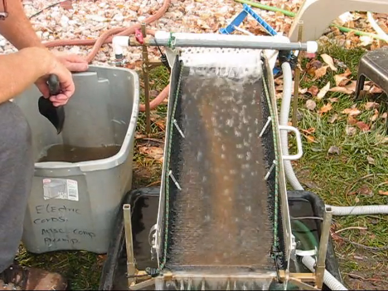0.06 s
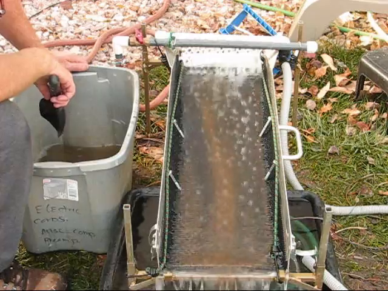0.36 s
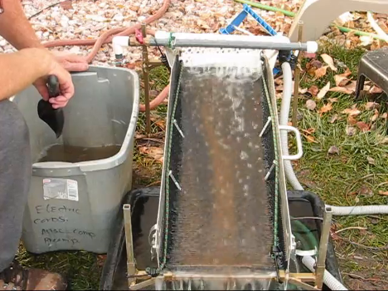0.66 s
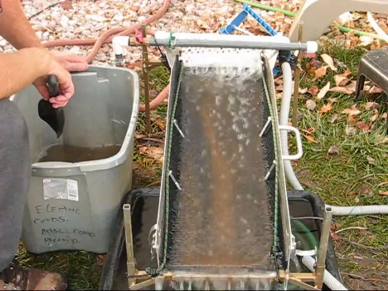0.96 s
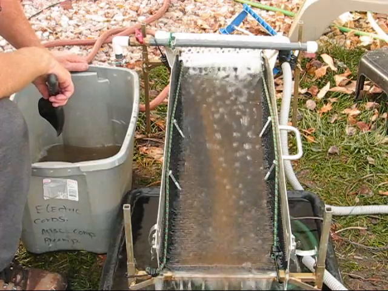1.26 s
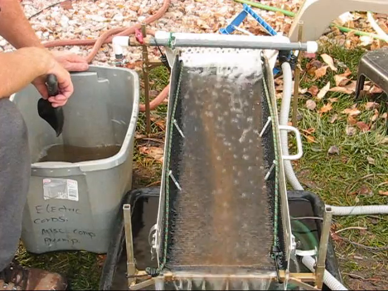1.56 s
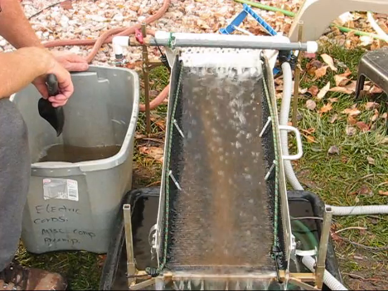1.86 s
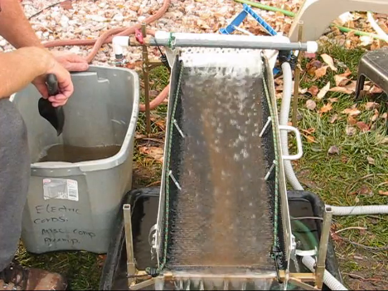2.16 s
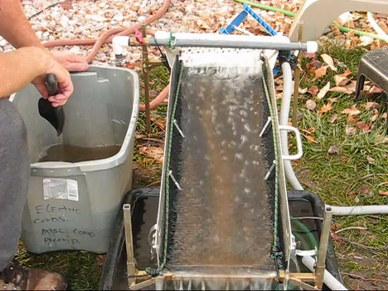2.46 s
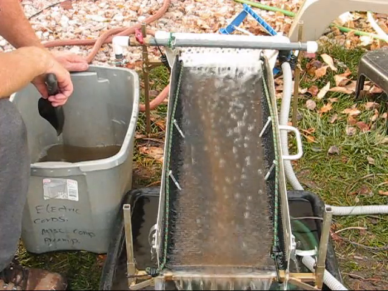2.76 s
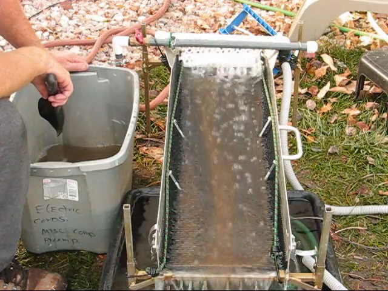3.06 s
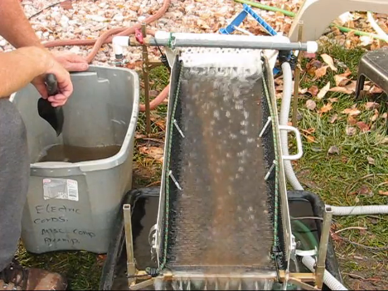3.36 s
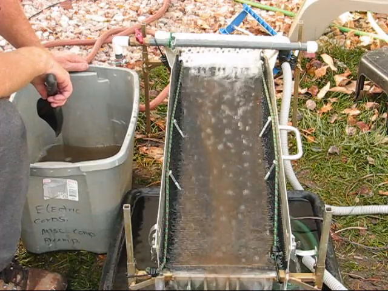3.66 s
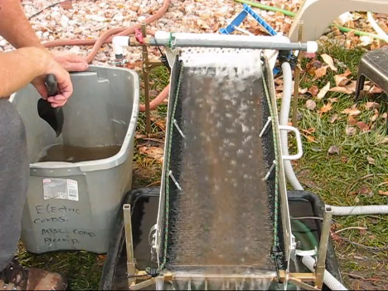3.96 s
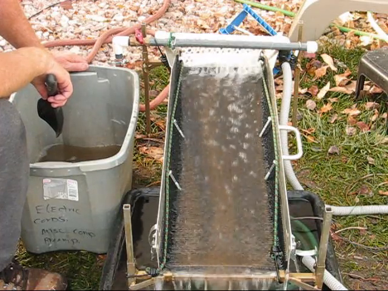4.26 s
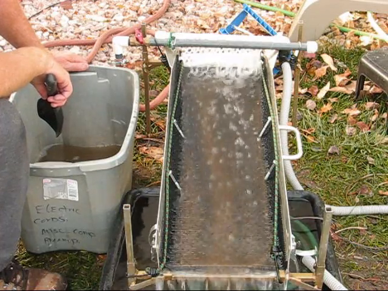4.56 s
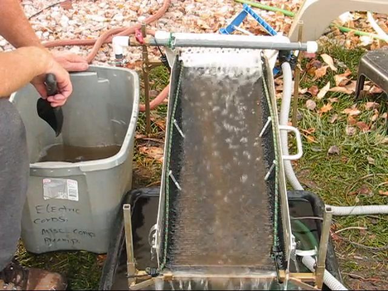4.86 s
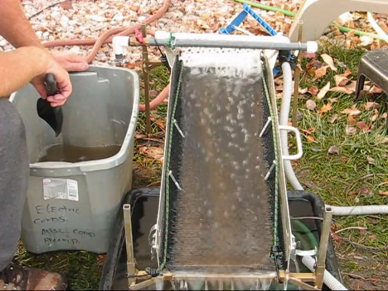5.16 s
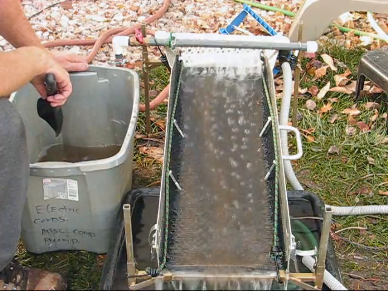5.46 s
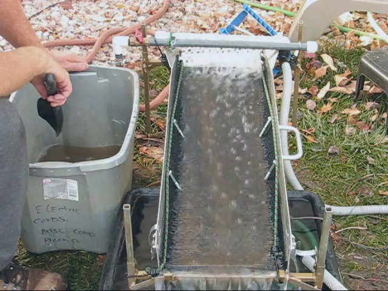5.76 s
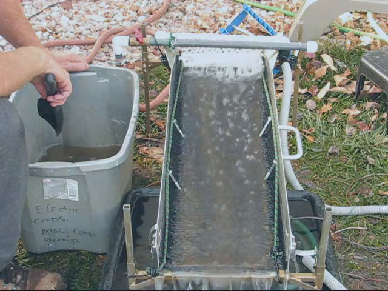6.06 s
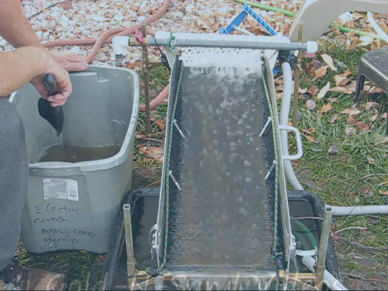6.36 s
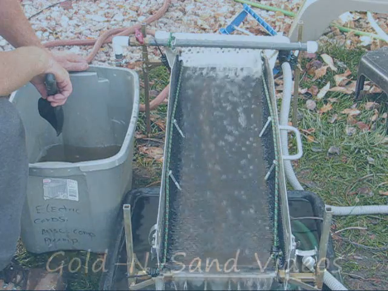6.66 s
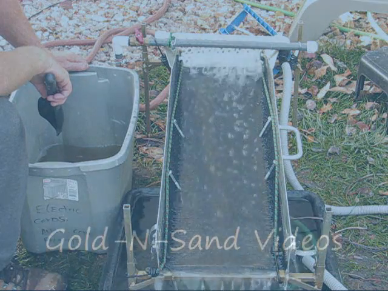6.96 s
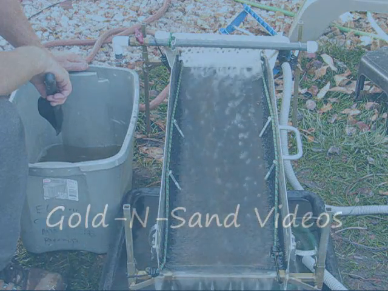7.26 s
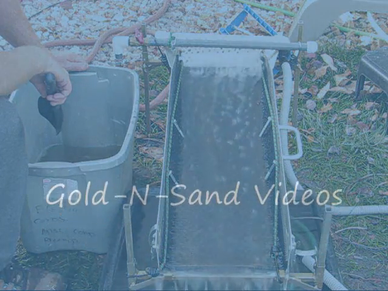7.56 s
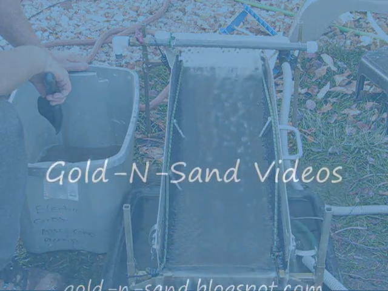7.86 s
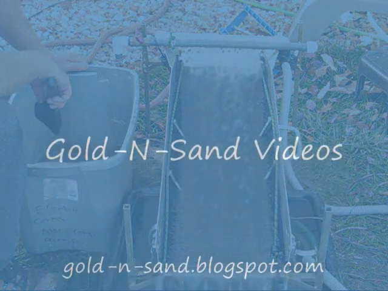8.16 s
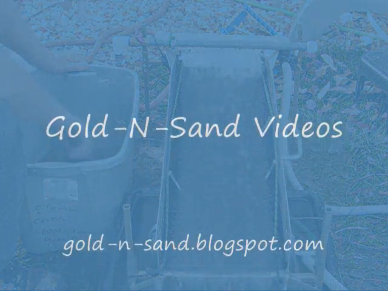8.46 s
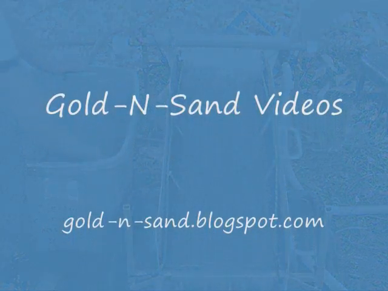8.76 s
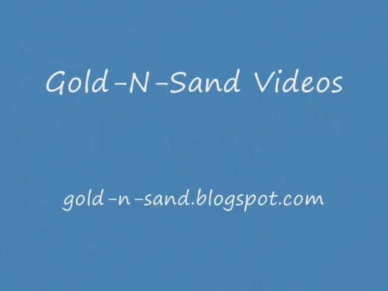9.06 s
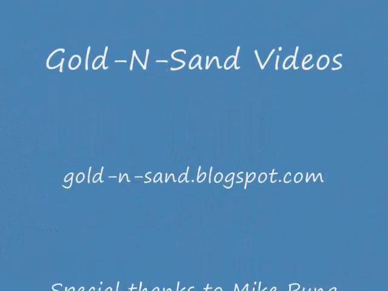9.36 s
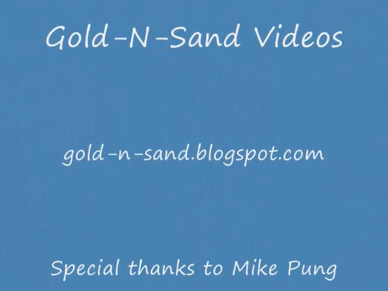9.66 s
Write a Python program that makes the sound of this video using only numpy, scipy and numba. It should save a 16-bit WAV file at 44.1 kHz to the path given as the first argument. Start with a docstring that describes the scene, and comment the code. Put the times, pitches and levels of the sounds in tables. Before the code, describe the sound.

Outdoors, close to a sluice, jets of water drum onto the chute in a dense, bright hiss flecked with sharp little splats. The runoff churns and gurgles into a hollow plastic tub, with scattered plips and small gulps. A pump hums very faintly underneath, with a thin whistle that comes and goes. The flow holds steady for about five seconds, then gradually fades to silence.

```python
"""Outdoors, close to a sluice: a spray bar drums water onto its head, and the sheet runs down and plunges
into a plastic tub. Dense drop impacts and tiny resonating bubbles make the hiss; larger bubbles, which
ring lower, churn in the hollow tub. The pump hums, its line whistles faintly, and a low drone swells
once. The scene is heard through two closely spaced ports and fades out at the end."""
import sys
import numpy as np
from scipy import signal
from scipy.fft import rfft, irfft
from scipy.io import wavfile
from scipy.ndimage import map_coordinates
from numba import njit

SR = 44100
rng = np.random.default_rng(int(sys.argv[2]) if len(sys.argv) > 2 else 0)


def bounce(signal):
    """Save signal as a 16-bit WAV file at the path given by the first command-line argument."""
    frames = np.transpose(np.atleast_2d(signal))
    limited = np.clip(frames, -1, 1)
    pcm = np.round(limited * 32767).astype(np.int16)
    wavfile.write(sys.argv[1], SR, pcm)


N = 432180
T = np.arange(N) / SR
TOP_HZ = 15800
# Spectrum of water striking the sluice. Each row: frequency in Hz, relative level in dB.
IMPACT_SPECTRUM = [(60, -44), (300, -34.5), (900, -9.5), (1900, -8.5), (2800, -6.5), (3800, -2.3),
                   (4400, -3.5), (5300, -2.5), (5850, -3.2), (6300, 0.1), (6800, -1.5), (7350, 1.3),
                   (8400, -6), (9800, -10), (11300, -13.5), (13200, -16), (15000, -21.5), (16000, -27.5)]


def undb(db):
    """Amplitude ratio: a factor of ten for every 20 dB."""
    return 10 ** (np.asarray(db) / 20)


def level(x, db):
    """Normalisation to an rms level in dB."""
    return x * undb(db) / np.sqrt(np.mean(x ** 2))


def colour(x, points, power=1):
    """Minimum-phase filter through (Hz, dB) points, its gain raised to `power`."""
    hz, db = np.transpose(points)
    log_hz = np.log(np.fft.rfftfreq(N, 1 / SR) + 1)
    log_gain = power * np.log(undb(np.interp(log_hz, np.log(hz), db)))
    cepstrum = irfft(log_gain, N)
    cepstrum[1:N // 2] *= 2  # folding onto positive time makes the filter causal
    cepstrum[N // 2 + 1:] = 0
    return irfft(rfft(x) * np.exp(rfft(cepstrum)), N)


def wander(rate):
    """Random modulation of rms 1, interpolated between `rate` values a second."""
    steps = rng.standard_normal(N // 20)
    return level(map_coordinates(steps, [T * rate], order=1, mode="wrap"), 0)


def envelope(curve):
    """Amplitude envelope through (seconds, dB) points."""
    return undb(np.interp(T, *np.transpose(curve)))


def wavering_tone(hz, waver_hz):
    """Frequency modulation: a sine of rms 1 whose pitch strays at random."""
    return np.sqrt(2) * np.sin(2 * np.pi * np.cumsum(hz + waver_hz * wander(25)) / SR)


def wash(width, apart_hz=9500):
    """Countless impacts superpose into Gaussian noise, less coherent between the ports for short waves."""
    mid, side = rng.standard_normal((2, N))
    hz = np.fft.rfftfreq(N, 1 / SR).clip(0, TOP_HZ)
    side = irfft(rfft(side) * np.sqrt(1 + (hz / apart_hz) ** 4), N)
    return level(np.array([mid + width * side, mid - width * side]), 0)


@njit
def ring(start, hz, q, size, pan, rise):
    """Bubbles as damped oscillators: each dies by 1/e in q / pi periods and rises in pitch as it ascends."""
    out = np.zeros((2, N))
    for k in range(len(start)):
        first, life, phase = int(start[k] * SR), q[k] * SR / hz[k] / np.pi, 0.
        for i in range(min(int(6 * life), N - first)):
            phase += 2 * np.pi * hz[k] / SR * (1 + rise[k] * i / (3 * life))
            pressure = size[k] * np.exp(-i / life) * np.sin(phase)
            out[0, first + i] += pressure * (1 + pan[k])
            out[1, first + i] += pressure * (1 - pan[k])
    return out


def bubble_cloud(flow, low_hz, high_hz, q, scatter_db, width, rise, count):
    """Independent resonators: bubbles of many sizes superpose, excited harder when the flow surges."""
    when, pitch, strength, damping, place = rng.random((count, 5)).T
    hz = low_hz * (high_hz / low_hz) ** pitch
    # small bubbles get a sharper kick; a few are much stronger than the rest
    size = hz * undb(-scatter_db * np.log(strength + 0.025)) * flow[(when * N).astype(int)]
    quality = q * 2 ** (2 * damping - 1)
    pan = width * (2 * place - 1)
    return level(ring(when * N / SR, hz, quality, size, pan, np.full(count, float(rise))), 0)


def lone_bubbles(table, q, rise, gain_db):
    """Free oscillation of single bubbles; the bigger the bubble, the wider the interval it sweeps."""
    start, db, hz = np.array(table, float).T.copy()
    quality, pan = np.full(len(hz), float(q)), np.zeros(len(hz))
    return ring(start, hz, quality, undb(db + gain_db), pan, rise * hz.min() / hz)


def drone(peak_s=7.15, swell_s=0.76, hz=123.6, rise_hz_per_s=11):
    """A faint low tone glides upward under a single Gaussian envelope."""
    since_peak = T - peak_s
    swell = np.exp(-(since_peak / swell_s) ** 2)
    return undb(-50) * swell * wavering_tone(hz + rise_hz_per_s * since_peak, waver_hz=2.02)


def pump(hum_hz=249, whistle_hz=1233, flat_hz=31.05, settle_s=1.3, ramp_s=0.14):
    """Two modulated tones: the pump hums, and its line whistles with a fluttering amplitude."""
    # Swells of the whistle. Each row: start in seconds, length in seconds, level in dB before the fade.
    swells = [(.08, 0.61, -41), (1.257, 0.45, -42), (1.72, 1.15, -39.5), (3.65, 0.89, -44),
              (7.85, 1.03, -43)]
    hz = whistle_hz - flat_hz * np.clip(1 - T / settle_s, 0, 1)  # starts flat, then settles
    strength = undb(-49)  # between swells
    for start, length, db in swells:
        swell = np.clip(np.minimum(T - start, start + length - T) / ramp_s, 0, 1)
        strength = np.maximum(strength, undb(db) * swell)
    flutter = undb(1.5 * wander(14))
    whistle = strength * flutter * wavering_tone(hz, waver_hz=3.2)
    hum = undb(-59) * wavering_tone(hum_hz, waver_hz=1.8)
    return whistle + hum


def trickle():
    """Bubble resonance makes a bright tinkle where the edges of the sheet dribble off the lip."""
    # Strength of the dribble. Each row: time in seconds, gain in dB.
    dribble = [(0, 2), (2.6, -2), (2.9, -9.5), (3.5, 6.5), (4.3, 3.5), (4.6, 2), (5.3, 3), (5.8, -7.5),
               (6.55, -2), (7.1, 2.5)]
    flow = undb(wander(3.2))
    tinkle = bubble_cloud(flow, 797, 3190, q=18, scatter_db=1.8, width=0.4, rise=0.28, count=2200)
    return undb(-40.5) * tinkle * envelope(dribble)


def in_tub(x):
    """Cavity resonance: the hollow tub colours a sound and rings with it at its modes."""
    # Broad response of the tub. Each row: frequency in Hz, gain in dB.
    response = [(25, -22.5), (60, -24), (95, -14), (132, -11), (195, -12.5), (250, -8), (345, -11.5),
                (430, -4), (545, -3.5), (650, -6.5), (760, -6), (1020, -6), (1400, -15), (2200, -22.5),
                (5000, -41)]
    # Modes of the tub and the hollow under the sluice. Each row: centre in Hz, width in Hz, lift in dB.
    modes = [(78, 10, 4.5), (132, 26, 5), (176, 14, 2.5), (243, 43, 2.5), (299, 17, 3), (408, 19, 2.5),
             (485, 26, 2.5), (515, 14, 2.5), (552, 29, 4), (624, 20, 5), (697, 45, 3), (885, 33, 2.5),
             (989, 20, 2), (1033, 22, 1.5)]
    hz = np.geomspace(25, 5000, num=1000)
    tub_hz, tub_db = np.transpose(response)
    broad_db = np.interp(np.log(hz), np.log(tub_hz), tub_db)
    lift_db = sum(db * np.exp(-2 * ((hz - centre) / width) ** 2) for centre, width, db in modes)
    return colour(x, np.column_stack([hz, broad_db + lift_db]))


def gulps():
    """Big air pockets resonate at a low pitch and excite the modes of the tub."""
    # Each row: start in seconds, relative level in dB, starting pitch in Hz.
    air_pockets = [(.342, -17.5, 583), (1.193, -8.5, 740), (1.955, -16, 539), (2.156, -16, 534),
                   (2.411, -17, 609), (3.858, -11, 467), (4.428, -10.5, 600), (5.218, -16.5, 535),
                   (6.302, -12, 665)]
    return in_tub(lone_bubbles(air_pockets, q=7.5, rise=0.19, gain_db=-3.5))


def plips(low_cut_hz=700):
    """Bubble resonance rises near a free surface: shallow bubbles chirp, deep ones hold their note."""
    # Each row: start in seconds, level in dB, starting pitch in Hz, quality factor,
    # fractional pitch rise over three decay times.
    loud_bubbles = [(.021, -22, 2560, 36, .2), (.847, -20.5, 1340, 22, .4), (1.135, -20.5, 1440, 12, 0.32),
                    (1.169, -20.5, 2100, 38, .6), (1.204, -21, 923, 34, .65), (3.256, -21.5, 1840, 27, .3),
                    (3.87, -20.5, 1720, 25, .3), (4.083, -21.5, 1290, 21, .8), (4.125, -23, 1970, 27, .25),
                    (4.3856, -14, 1140, 13, .2), (4.3845, -20.5, 1410, 28, 2.5),
                    (4.899, -23.5, 2290, 30, .25), (5.22, -22, 1970, 35, .25),
                    (5.479, -17.5, 1075, 16, 0.55), (6.312, -15, 3670, 27, .1), (7.935, -31, 2310, 32, .25),
                    (8.23, -33.5, 3590, 95, .02), (8.587, -41, 2220, 45, .02), (8.602, -41, 2130, 65, .03)]
    start, db, hz, q, rise = np.array(loud_bubbles, float).T.copy()
    rings = ring(start, hz, q, undb(db), np.zeros(len(hz)), rise)
    return signal.sosfilt(signal.butter(2, low_cut_hz, "highpass", fs=SR, output="sos"), rings)


def plunge():
    """Air entrainment: the falling sheet drags bubbles into the tub, where they gurgle over a low churn."""
    # Strength of the plunge. Each row: time in seconds, gain in dB.
    strength = [(0, 0.5), (1.5, -0.5), (1.72, -1), (2.05, .4), (2.5, -1), (2.9, -0.5), (3.5, 0.4), (3.9, 0),
                (4.25, -.5), (4.5, 0.1), (5.2, 0), (6.3, -0.3), (7.7, -0.4), (8.7, 0.2)]
    flow = undb(0.14 * wander(10) + 0.5 * wander(60))
    gurgle = bubble_cloud(flow, 265, 2160, q=6.8, scatter_db=2.5, width=0.2, rise=0.22, count=11500)
    churn = flow * wash(width=0.1)
    return (level(in_tub(gurgle), -32.5) + level(in_tub(churn), -34.8)) * envelope(strength)


def splats(attack_s=0.0009, low_pass_hz=9500):
    """Impact and entrainment: a fat drop ticks, bursts into crackle and traps a tiny bubble that pings."""
    # Each row: start in seconds, relative level in dB, crackle decay in seconds, bubble pitch in Hz.
    fat_drops = [(0.0714, -8.5, 0.001, 5250), (0.435, -5.5, 0.004, 6830), (0.8895, -7.5, 0.003, 7450),
                 (0.9425, -8.5, 0.004, 4300), (0.9495, -7, 0.004, 4050), (0.9937, -8.5, 0.001, 4110),
                 (1.0453, -12, 0.004, 6350), (1.2692, -9, 0.004, 7110), (1.3379, -4.5, 0.003, 6500),
                 (1.4752, -7, 0.001, 5510), (1.6175, -6, 0.004, 6500), (1.6514, -5, 0.0044, 7280),
                 (1.687, -6.5, 0.003, 7450), (1.8897, -7.5, 0.001, 6850), (2.028, -4.5, 0.0011, 5280),
                 (2.0775, -5.5, 0.0018, 7360), (2.168, -6, 0.001, 6070), (2.2063, -6, 0.001, 7060),
                 (2.4325, -13, 0.004, 3800), (2.4578, -6, 0.0015, 4990), (2.461, -5.5, 0.0011, 7260),
                 (2.4937, -8.5, 0.00081, 7240), (2.6397, -3.5, 0.002, 7390), (2.6792, -7, 0.0015, 7360),
                 (2.734, -11.5, 0.003, 3890), (2.76, -7.5, 0.004, 7040), (2.852, -5.5, 0.0028, 7250),
                 (2.8886, -10.5, 0.001, 6290), (2.936, -8.5, 0.004, 4900), (3.0585, -10, 0.003, 4020),
                 (3.0725, -8, 0.0025, 4800), (3.1322, -8.5, 0.001, 5280), (3.796, -5.5, 0.0018, 6520),
                 (4.0595, -7, 0.003, 4300), (4.0715, -5, 0.004, 7520), (4.1076, -5.5, 0.001, 4970),
                 (4.2983, -5.5, 0.001, 5450), (4.365, -6, 0.0044, 6500), (4.4783, -7.5, 0.002, 4800),
                 (4.4995, -11.5, 0.0015, 5200), (4.5833, -8.5, 0.001, 5620), (4.772, -6, 0.0015, 6120),
                 (5.2349, -3.5, 0.001, 7620), (5.4451, -6.5, 0.001, 7280), (5.5597, -4.5, 0.001, 6780),
                 (5.647, -4.5, 0.0011, 7300), (5.7229, -10, 0.001, 5080), (5.781, -8.5, 0.0011, 6480),
                 (5.8373, -7, 0.0044, 7560), (5.8467, -12.5, 0.001, 6400), (6.462, -8.5, 0.001, 5920),
                 (6.5722, -9, 0.004, 7640), (6.6086, -5, 0.0033, 6460), (6.6763, -4, 0.001, 6630),
                 (6.8812, -15, 0.002, 6520), (6.92, -10, 0.001, 6680), (7.108, -13, 0.0015, 7130),
                 (7.2645, -15, 0.003, 6440), (7.314, -13, 0.001, 7520), (7.3352, -11, 0.001, 6330),
                 (7.8948, -17.5, 0.001, 5000)]
    burst, ticks = np.zeros((2, N))
    for start, db, decay_s, _ in fat_drops:
        near = slice(int(start * SR), int(start * SR) + SR // 50)
        age = T[near] - start
        burst[near] += undb(db) * np.minimum(age / attack_s, np.exp((attack_s - age) / decay_s))
        ticks[int((start + attack_s / 2) * SR)] = undb(db - 11.5)
    fragments = level(colour(wash(width=0.37), IMPACT_SPECTRUM), 0)
    crackle = burst * level(np.tanh(fragments), -11)  # a drop's fragments are of much the same size
    trapped = [(start + attack_s, db, hz) for start, db, _, hz in fat_drops]
    pings = lone_bubbles(trapped, q=12, rise=0.06, gain_db=-2.5)
    mix = crackle + 2 * colour(ticks, IMPACT_SPECTRUM) + pings
    return signal.sosfilt(signal.butter(2, low_pass_hz, fs=SR, output="sos"), mix)


def drops(flow, scatter_db, width, lag_samples, count):
    """Each drop is an impulse whose direction sets its time and level differences between the ports."""
    when, strength, place = rng.random((count, 3)).T
    onset, side = (when * (N - 1)).astype(int), 2 * place - 1
    polarity = (-1) ** np.arange(count)
    size = undb(-scatter_db * np.log(strength + 0.0073)) * flow[onset] * polarity
    ports = []
    for bearing in (side, -side):
        arrival = np.round(onset + bearing * lag_samples).astype(int) % N
        ports.append(np.bincount(arrival, size * (1 + bearing * width), N))
    return level(np.array(ports), 0)


def spray():
    """Jet breakup: the water lands in clumps, so drops, fizz, mist and ringing droplets sputter together."""
    # Strength of the jets, which stutter once. Each row: time in seconds, gain in dB.
    jets = [(0, 0), (6.42, 0), (6.5, -2.5), (6.56, -3), (6.61, 0), (6.67, 1.5), (6.695, -4), (6.74, 0.5),
            (6.785, -2), (6.84, 0)]
    flow = undb(0.14 * wander(8.2) + 0.5 * wander(55) + wander(380))
    patter = drops(flow, scatter_db=3.5, width=0.55, lag_samples=0.61, count=44000)
    fizz = bubble_cloud(flow, 1395, 13130, q=17, scatter_db=3, width=0.44, rise=0.075, count=22000)
    mist = flow * wash(width=0.16)
    droplets = bubble_cloud(flow, 3427, 7100, q=42, scatter_db=1.6, width=0.49, rise=0.032, count=900)
    mix = patter + undb(-3) * fizz + undb(1) * mist + undb(-12.5) * droplets
    return level(colour(mix, IMPACT_SPECTRUM), -22.5) * envelope(jets)


def scene(fade_start_s=5.26, fade_end_s=9.07):
    """Superposition: the continuous sources fade linearly; single splats and bubbles keep their levels."""
    fade = np.clip((fade_end_s - T) / (fade_end_s - fade_start_s), 0, 1)
    continuous = spray() + plunge() + trickle() + pump() + drone()
    return fade * continuous + splats() + gulps() + plips()


def record(dry, low_cut_hz=37):
    """Each port has its own frequency response; band limiting removes the deep bass and the top."""
    # Contrast of the ports, applied in part to each. Each row: frequency in Hz, left over right in dB.
    contrast = [(100, -1), (600, -0.8), (1700, -3), (2500, -7), (3150, -2.5), (4000, -3), (4600, -2.5),
                (5750, -2.5), (6500, -2), (7900, -5.5), (8700, -7.5), (10000, 2), (11200, 14.5),
                (11900, 12), (12900, -5.5), (14000, -1), (15500, -6)]
    ports = np.array([colour(dry[0], contrast, power=0.37), colour(dry[1], contrast, power=-0.46)])
    ports = signal.sosfilt(signal.butter(3, low_cut_hz, "highpass", fs=SR, output="sos"), ports)
    return signal.sosfilt(signal.ellip(10, 0.1, 80, TOP_HZ, fs=SR, output="sos"), ports)


dry = scene()
out = record(dry)
bounce(out)
```